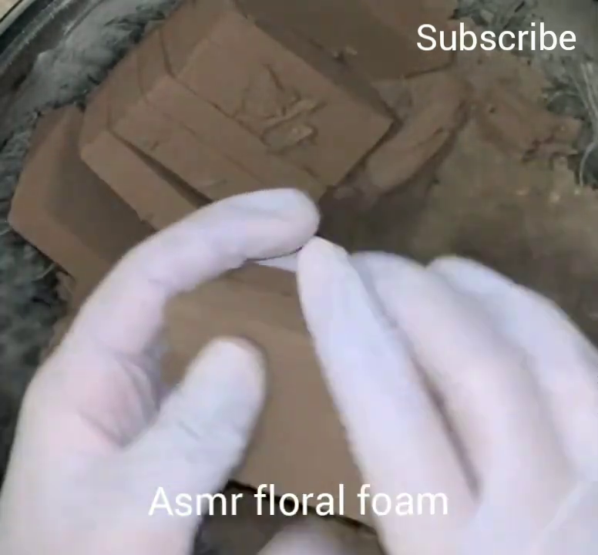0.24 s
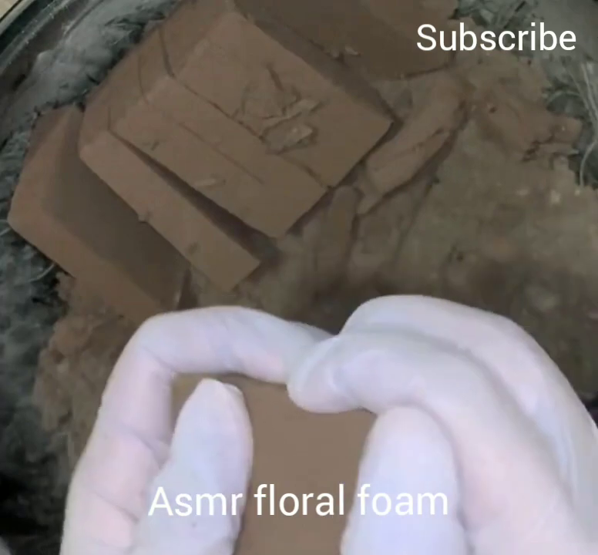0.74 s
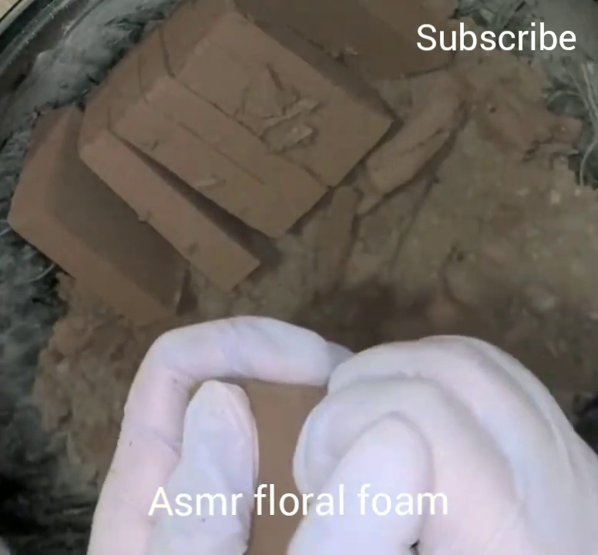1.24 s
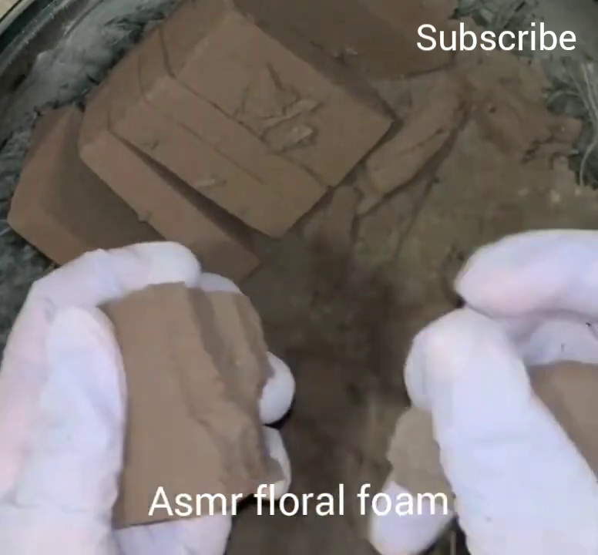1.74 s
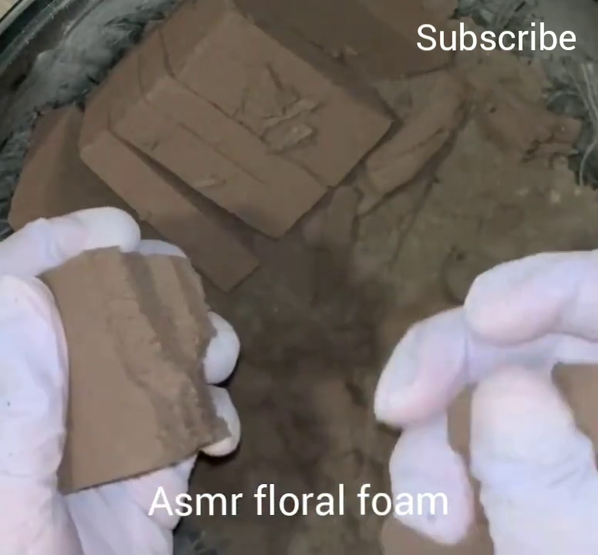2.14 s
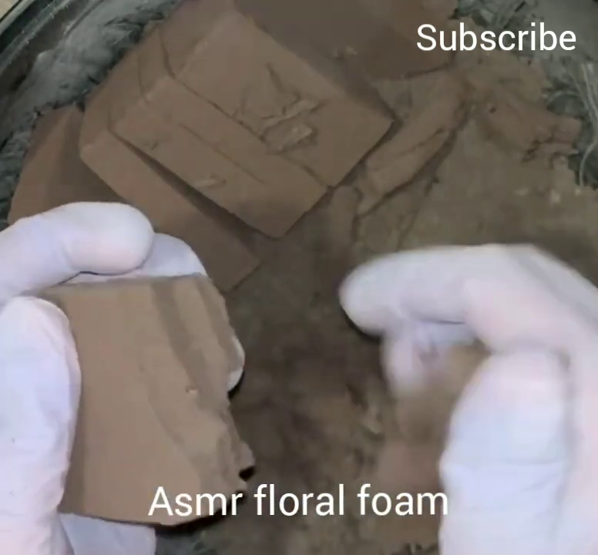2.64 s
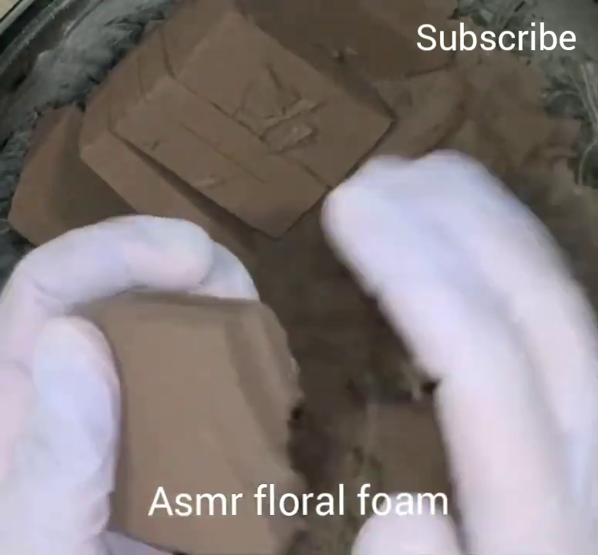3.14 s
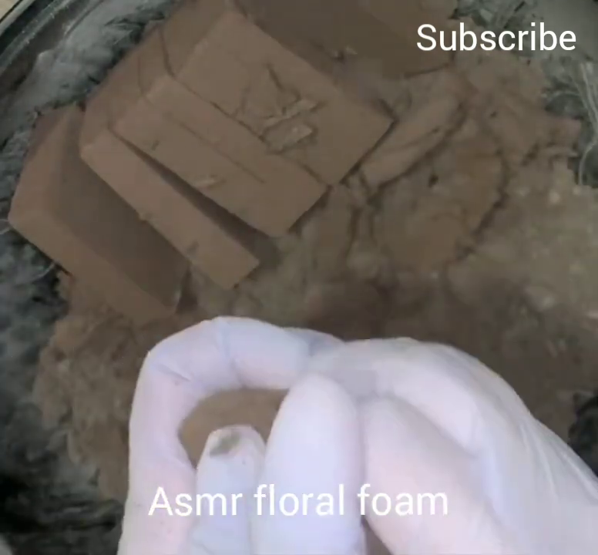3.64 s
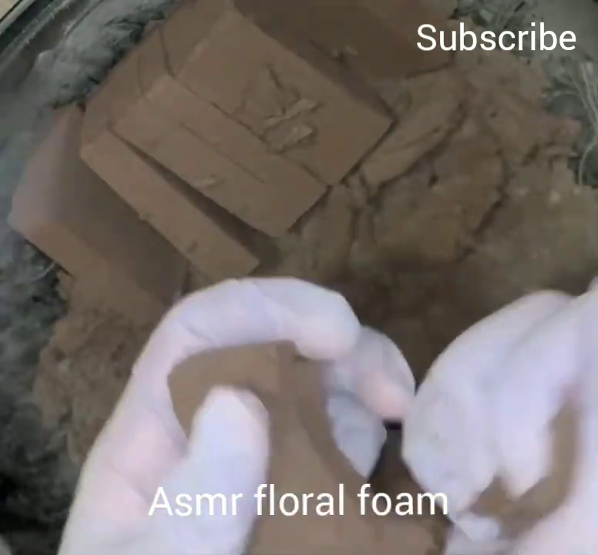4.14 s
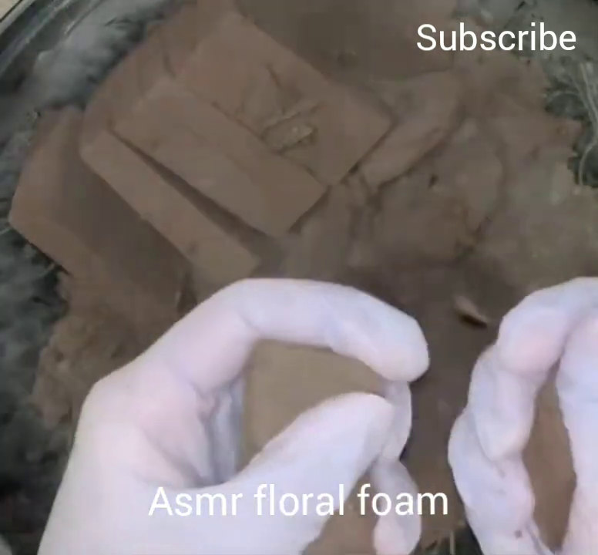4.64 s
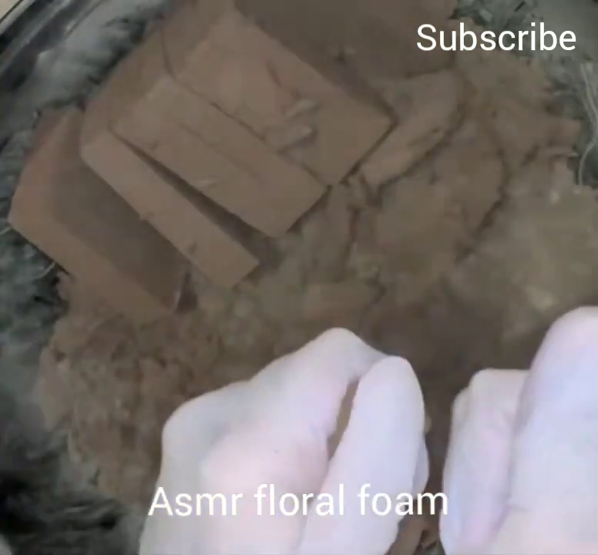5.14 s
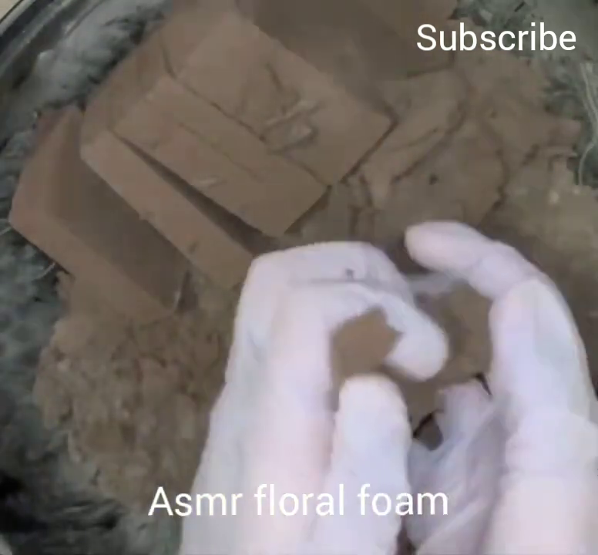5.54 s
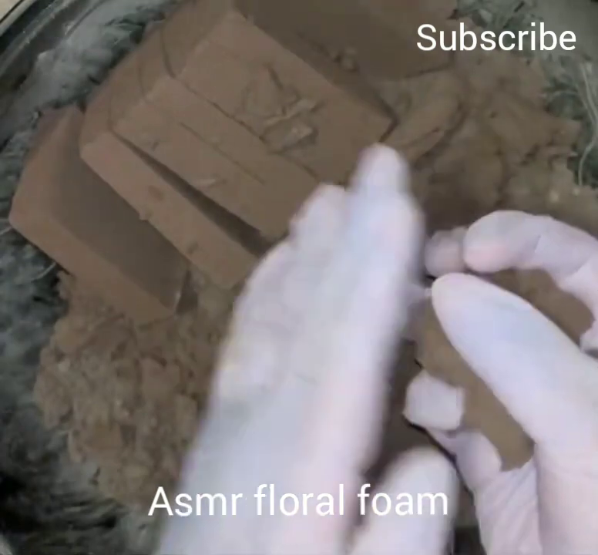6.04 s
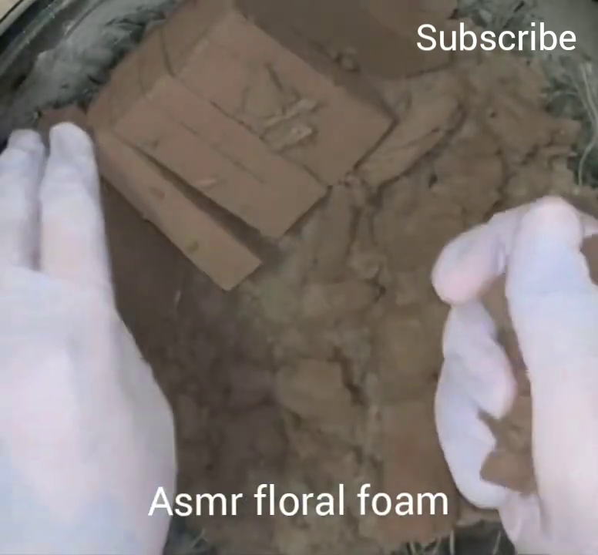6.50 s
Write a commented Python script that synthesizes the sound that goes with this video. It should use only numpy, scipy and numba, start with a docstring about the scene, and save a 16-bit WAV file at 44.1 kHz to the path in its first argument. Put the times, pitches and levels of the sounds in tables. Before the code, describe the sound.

Gloved hands crush dry, brittle foam close by, making crisp crunching and crackling in repeated squeezes with small snaps.

```python
"""Over a tub of crumbs, close to a two-port phone, gloved hands crush blocks of dry brittle foam.
Thousands of cell walls crack each second, bigger pieces snap with a dull knock, and the hands bump
softly through the tub. A motor hums far off. The loudest squeezes overload the recorder, and the
sound drops out once for a quarter second."""
import sys
import numpy as np
from scipy import signal
from scipy.fft import rfft, irfft, next_fast_len
from scipy.io import wavfile
from scipy.ndimage import uniform_filter1d
from numba import njit

SR = 44100
rng = np.random.default_rng(int(sys.argv[2]) if len(sys.argv) > 2 else 0)


def wrap_up_sound(samples):
    """Save the sound to the file named by the first command line argument, as 16-bit audio."""
    columns = np.atleast_2d(samples).T
    # keep every value between -1 and 1, then stretch to whole-number steps
    tamed = np.clip(columns, -1, 1)
    steps = np.round(tamed * 32767).astype(np.int16)
    wavfile.write(sys.argv[1], SR, steps)


N = 298557
T = np.arange(N) / SR
FFT_SIZE = next_fast_len(N)
HZ = np.fft.rfftfreq(FFT_SIZE, 1 / SR) + 1e-3


# tone of a cracking cell wall, shaped by the hands and the tub: f/Hz, level/dB
CELL_TONE = [(900, -24.5), (1300, -13), (1550, -5.5), (1900, -4.5), (2300, -3), (2750, -2), (3200, -0.5),
             (4000, 2.5), (4500, 1), (4950, 2.5), (5500, -0.5), (6900, -1), (7700, -1.5), (8800, 2),
             (9500, 0), (10300, 0), (12500, -2), (14000, -1.5), (15500, -4)]
# tone of the block's body: f/Hz, level/dB
BODY_TONE = [(71, -37), (120, -13), (162, -7), (291, -2), (409, -8.5), (667, -4.5), (983, -4), (1300, 8.5),
             (1690, -43), (2860, -120)]

def foam():
    """Cells of all sizes give way together under the hands; each size also flickers alone."""
    fine_db, coarse_db = squeeze()
    medium_db, dust_db, body_db, _ = size_mix()
    coarser_db = coarse_db + 9  # coarser breaking than usual lifts the mids and the body
    jump_db = slips()
    fine = grit(6000, 9774, per_s=14000, spread_db=1.5, cycles=34, ring_db=-12.5)
    fine *= undb(fine_db + jump_db + walk(45))
    medium = grit(3008, 6013, per_s=12000, spread_db=2.75, cycles=55, ring_db=-7)
    medium *= undb(fine_db + medium_db + 0.33 * coarser_db + 1.05 * jump_db + 0.16 * walk(33))
    coarse = grit(1100, 3003, per_s=8000, spread_db=2.8, cycles=52, ring_db=-7)
    coarse *= undb(fine_db + coarse_db + jump_db + 1.65 * walk(45))
    dust = band(cracks(18000, 1.3), 9660, 27000, CELL_TONE)
    dust *= undb(fine_db + dust_db + 0.79 * jump_db + 1.3 * walk(30))
    body = band(cracks(4000, 1.85), 120, 906, BODY_TONE)
    body *= undb(fine_db + body_db + 0.67 * coarser_db + jump_db + 0.89 * walk(20))
    lone_ticks = band(cracks(250, 1.8), 1500, 20000, CELL_TONE) * undb(fine_db + jump_db - 9)
    return lone_ticks + fine + medium + coarse + dust + body


# one envelope per grip of the hands: t/s, fine crackle/dB, coarse crackle/dB re fine
GRIPS = [
    [(0, -21, -12), (.054, -23.5, -12), (.125, -40, -13), (.188, -29, -24.5), (.22, -33.5, -7.5),
     (.332, -27.5, -10.5), (.445, -38, -12)],
    [(.52, -25, -10), (.57, -26, -8), (.63, -25, -6), (.69, -19.5, -1), (.76, -18.5, -4), (.8, -15.5, -3),
     (.87, -14, -2), (.94, -14.5, -2.5), (1.02, -15.5, -5), (1.08, -15, -9), (1.125, -12, -6.5),
     (1.17, -13, -4.5), (1.2, -19, -10), (1.235, -20, -8), (1.298, -28.5, -8), (1.34, -31.5, 0),
     (1.377, -38.5, -10)],
    [(1.44, -30.5, -7.5), (1.58, -29.5, -3), (1.71, -22.5, -7.5), (1.82, -26, -11), (1.95, -19, -9.5),
     (2, -20.5, -9), (2.106, -17, -13), (2.25, -26.5, -5), (2.31, -26.5, -9.5), (2.52, -38, -10.5),
     (2.59, -37.5, -30), (2.654, -36.5, -15.5)],
    [(2.963, -36.5, -7), (3.013, -27, -12.5), (3.083, -36.5, -21.5), (3.143, -24, -10.5),
     (3.178, -28.5, -14.5), (3.22, -21.5, -11.5), (3.273, -23, -5)],
    [(3.31, -14, -4.5), (3.463, -9, -3.5), (3.516, -19, -9), (3.59, -16.5, -4), (3.657, -15.5, -6),
     (3.705, -27.5, -0.5), (3.756, -32, -4.5), (3.85, -24.5, -14), (3.934, -20.5, -7.5), (3.98, -38.5, -8)],
    [(4.08, -27, -14.5), (4.116, -32, -11), (4.21, -22.5, -12), (4.265, -26, -6.5), (4.35, -18, -8),
     (4.42, -18, -9), (4.53, -9.5, -11.5), (4.64, -16, -11), (4.72, -12.5, -13), (4.83, -21, -13.5),
     (4.92, -15.5, -8), (5.1, -29, -1.5), (5.155, -37.5, -8)],
    [(5.268, -34.5, -6.5), (5.318, -31, -6.5), (5.418, -32.5, -9), (5.53, -30, -9.5), (5.572, -33.5, -15),
     (5.72, -28, -13.5), (5.887, -36.5, -7)],
    [(5.946, -27, -6), (6, -27.5, -7), (6.07, -20, -7), (6.224, -19, -8.5), (6.33, -25.5, -9),
     (6.46, -21.5, -11.5), (6.5, -25.5, -12), (6.556, -37, -10), (6.61, -25, -6.5), (6.67, -33.5, -5),
     (6.77, -25.5, -10.5)],
]

def squeeze():
    """The crackle swells and eases with each grip: fine and coarse envelopes in dB."""
    return curves(T, np.concatenate(GRIPS))


# mix of what crumbles: t/s, medium/dB re fine, dust/dB re fine, body/dB re fine, rumble/dB
SIZE_MIX = [(0, -3.5, 2, -13.5, -45), (.6, -5, 4.5, -16, -46), (1.1, -5.5, 4.5, -19.5, -44),
            (1.5, -0.5, 2.5, -14.5, -43.5), (2, -4.5, 4, -22, -49.5), (2.6, -2.5, 5, -4.5, -42),
            (3, -5, -4.5, -10, -44), (3.4, -2, 7.5, -22, -56), (3.85, -4, -2, -17.5, -48),
            (4.3, -4, 3, -20, -51), (4.75, -4, 4, -19, -50.5), (5.1, -5, 3.5, -9.5, -43),
            (5.6, -4, 1.5, -10, -42), (6.1, -5, 1, -19, -52), (6.4, -3.5, 3.5, -13.5, -42),
            (6.77, -8.5, 2.5, -12.5, -45.5)]

def size_mix():
    """The blend of fragment sizes shifts slowly: medium, dust, body and rumble envelopes in dB."""
    return curves(T, SIZE_MIX)


# accents where the foam gives under the fingers: t/s, jump/dB, settling time/s
SLIP_CUES = [(0.056, 9.5, 0.0026), (0.249, 8, 0.028), (0.326, 5, 0.012), (0.476, 12, 0.0054),
             (0.615, 11, 0.0067), (0.721, 13, 0.0035), (0.751, 7, 0.005), (0.805, 9, 0.003),
             (0.904, 9, 0.019), (0.989, 8, 0.026), (1.039, 16, 0.013), (1.147, 20, 0.024),
             (1.255, 15, 0.0036), (1.327, -1, 0.0055), (1.419, 5, 0.0028), (1.501, 15.5, 0.0063),
             (1.596, 1, 0.014), (1.651, 6.5, 0.0026), (1.67, 9, 0.0038), (1.695, 9, 0.0053),
             (1.758, -13, 0.0019), (1.814, 13, 0.0042), (1.945, 5.5, 0.017), (2.011, 8, 0.0071),
             (2.278, 16, 0.0046), (2.306, 4, 0.0072), (2.402, 4, 0.00607), (2.558, 2, 0.011),
             (2.62, 11, 0.022), (2.993, 6.5, 0.0097), (3.122, 4, 0.014), (3.205, 11, 0.0059),
             (3.562, 17, 0.011), (3.616, 15.5, 0.015), (3.902, 5, 0.018), (4.034, 15, 0.0037),
             (4.078, 9, 0.003), (4.304, 7, 0.0065), (4.347, 5, 0.0033), (4.414, 6, 0.006),
             (4.686, 28, 0.0074), (4.89, 33.5, 0.0058), (4.915, 12, 0.004), (4.942, 9.5, 0.003),
             (5.003, 14, 0.0036), (5.075, 11.5, 0.003), (5.127, 9, 0.008), (5.312, 9.5, 0.01),
             (5.347, 9, 0.007), (5.436, 10, 0.009), (5.457, 2, 0.003), (5.471, 8.5, 0.003),
             (5.51, 8, 0.003), (5.527, 6.5, 0.005), (5.717, 13, 0.003), (5.754, 11, 0.0094),
             (6.029, 17, 0.0066), (6.06, 10, 0.003), (6.08, 2, 0.0053), (6.138, 3.5, 0.0027),
             (6.225, 7, 0.0073), (6.601, 0, 0.0058), (6.745, 12, 0.0087), (0.123, 8.5, 0.014),
             (0.862, 4.5, .006), (0.96, 12, 0.005), (1.098, 11.5, 0.014), (1.865, 6, 0.01),
             (3.346, 6, .004), (3.371, 7, .006), (3.431, 8, 0.011), (3.454, 12, .012), (3.58, 6, .004),
             (3.606, 8, .003), (4.628, 7, .005), (1.163, 6, .008), (3.6, 11.5, 0.014), (4.513, 12, 0.0056),
             (4.534, 16, 0.0094)]

def slips():
    """Each sudden give jolts the crackle level, in dB, then settles; many small ones come by chance."""
    large = np.zeros(N)
    for s, db, settle_s in SLIP_CUES:
        age = np.maximum(T - s, 0)
        large += db * np.exp(-age / settle_s) * (1 - np.exp(-age / 0.0028))
    kicks = (rng.random(N) < 90 / SR) * rng.exponential(size=N)
    small = signal.lfilter([1], [1, -np.exp(-1 / (0.0061 * SR))], kicks)
    return large + 0.87 * small


def grit(lo_hz, hi_hz, per_s, spread_db, cycles, ring_db):
    """Dry clicks and ringing crumbs from one range of cell sizes."""
    clicks = unit_rms(cracks(per_s, spread_db))
    ringing = undb(ring_db) * crumbs(lo_hz, hi_hz, cycles)
    return band(clicks + ringing, lo_hz, hi_hz, CELL_TONE)


def cracks(per_s, spread_db):
    """Cell walls break in two unrelated showers of clicks: many small, few large."""
    size = undb(spread_db * rng.exponential(size=(2, N))) * rng.standard_normal((2, N))
    return size * (rng.random((2, N)) < per_s / SR)


def crumbs(lo_hz, hi_hz, cycles, per_s=1200, spread_db=1.2):
    """Stiff fragments ring for some cycles as they break free."""
    count = per_s * N // SR
    onset, pitch, size_rank = rng.random((count, 3)).T
    hz = lo_hz * (hi_hz / lo_hz) ** pitch
    size = undb(-spread_db * np.log(1 - size_rank))[:, None] * rng.standard_normal((count, 2))
    return unit_rms(ring((onset * N).astype(np.int64), hz, cycles / hz, size))


@njit
def ring(start, hz, decay_s, size):
    """Each crumb is a damped sine at its own pitch, with its own size in each of two rows."""
    out = np.zeros((2, N))
    for k in range(len(start)):
        pole = np.exp(2j * np.pi * hz[k] / SR - 1 / (decay_s[k] * SR))
        phasor = 1 + 0j
        for i in range(start[k], min(start[k] + int(5 * decay_s[k] * SR), N)):
            out[0, i] += size[k, 0] * phasor.imag
            out[1, i] += size[k, 1] * phasor.imag
            phasor *= pole
    return out


# pieces snapping: t/s, knock level/dB, f/Hz, crack level/dB
SNAP_CUES = [(0.019, -19.5, 666, -20), (0.472, -28, 350, -18), (0.65, -22, 737, -16),
             (0.842, -22.5, 592, -4), (0.903, -10, 1573, -7), (0.968, -10.5, 300, -15),
             (0.993, -19, 810, -5), (1.043, -13, 870, -15), (1.105, -10, 305, -9), (1.148, -8.5, 1500, -10),
             (1.334, -14.5, 727, -15), (1.526, -25, 350, -26), (1.695, -19.5, 735, -18),
             (2.201, -17, 313, -22.5), (3.276, -23, 865, -8), (3.561, -23, 347, -2),
             (3.919, -33, 1130, -24), (3.349, -12, 255, -12), (3.626, -10.5, 305, -6),
             (4.443, -27, 306, -7), (4.516, -16, 516, -11), (4.534, -8, 640, -8), (4.689, -10, 855, -1),
             (4.891, -18, 700, -8), (4.944, -19.5, 470, -8), (5.078, -15, 308, -15),
             (5.456, -22.5, 1300, -24), (5.686, -24.5, 345, -16), (5.736, -38, 370, -28),
             (6.03, -20, 796, -13), (6.364, -43, 460, -21)]
# modes of a breaking piece: multiple of its pitch, level/dB, decay/s
PIECE_MODES = [(1, 0, 0.0017), (.45, -6, 0.004), (1.55, -2, 0.0016), (2.2, -1, 0.0014), (3.1, -7, .0012)]

def snaps(length=2048, low_cut_hz=168):
    """Each break is a short damped knock of the block under a bright burst of cracks."""
    out = np.zeros((2, N + length))
    t = np.arange(length) / SR
    for s, knock_db, hz, crack_db in SNAP_CUES:
        knock = sum(undb(db) * np.sin(2 * np.pi * hz * ratio * t) * np.exp(-t / decay_s)
                    for ratio, db, decay_s in PIECE_MODES)
        knock *= 1 - np.exp(-t / 0.00075)  # the break takes a moment to run through
        bright_noise = signal.lfilter([1, -0.55], [1], rng.standard_normal((2, length)))
        burst = bright_noise * np.exp(-t / 0.009) * (1 - np.exp(-t / .002))
        i = int((s - .001) * SR)
        out[:, i:i + length] += undb(knock_db + 7.5) * knock * [[1], [.3]] + undb(crack_db) * burst
    # small pieces radiate little bass
    return signal.lfilter(*signal.butter(2, low_cut_hz, "high", fs=SR), out[:, :N])


# the sharpest single cracks: t/s, level/dB
TICK_CUES = [(0.478, -13), (0.619, -11), (0.724, -4), (1.257, -11), (1.654, -8), (1.673, -6), (1.761, -11),
             (1.816, -9), (1.948, -3), (2.064, -2), (2.1, -3), (2.283, -4), (3.347, -1), (3.372, -1),
             (3.608, 0), (4.084, -9), (4.353, -8), (5.005, -8), (5.44, -15), (6.034, -3), (6.062, -5),
             (6.084, -5), (6.149, -4), (6.195, -3), (6.229, -3)]

def ticks(decay_s=.0003, right_lag_s=.00016):
    """Single cracks die within a millisecond and reach the right port a moment later."""
    out = np.zeros((2, N + 256))
    for s, db in TICK_CUES:
        tick = np.diff(rng.standard_normal(129)) * np.exp(-np.arange(128) / SR / decay_s)
        for channel, lag_s in zip(out, (0, right_lag_s)):
            i = int((s + lag_s) * SR) - 6
            channel[i:i + 128] += undb(db) * tick / np.abs(tick).max()
    return out[:, :N]


# soft bumps of the hands through the tub: t/s, level/dB, f/Hz
THUMP_CUES = [(.03, -40, 109), (.45, -37, 68.8), (.62, -30, 73), (.74, -39, 129.4), (0.938, -28, 134.3),
              (1.04, -31, 109), (1.14, -31, 60), (1.659, -37, 70.3), (1.959, -35, 86.7), (2.182, -45, 138),
              (3.41, -22, 93.5), (3.55, -33, 75), (3.95, -39, 62.7), (4.501, -33, 114.5), (4.88, -34, 89),
              (4.96, -30, 65), (5.06, -35, 71), (5.65, -35, 72), (5.88, -38, 75), (6.181, -38, 107.4),
              (6.25, -35, 64.6), (6.33, -33, 75), (6.46, -33, 62.4), (6.71, -36, 74.7)]

def thumps(attack_s=0.016):
    """A bump sets off the tub's low wobble, which swells and dies softly."""
    out = np.zeros(N)
    for s, db, hz in THUMP_CUES:
        age = np.maximum(T - s, 0) / attack_s
        out += undb(db) * age * np.exp(1 - age) * np.sin(2 * np.pi * hz * (T - s))
    return out * np.array([[1], [.35]])


# colour of the air and the rumble: f/Hz, level/dB
ROOM_TONE = [(15, -54), (25, -1), (250, 1), (569, -6.5), (866, -21.5), (1120, -25), (1680, -12.5),
             (1970, -16), (2510, -11.5), (3000, -30.5), (3900, -63.5)]

def room():
    """A bed of air noise and low rumble; handling shakes the tub more in a hard squeeze."""
    air = band(rng.standard_normal((2, N)), 150, 3000, ROOM_TONE)
    air *= undb(-40 + 1.36 * walk(3.02) + 2.3 * walk(15))
    harder_db = squeeze()[0] + 27  # fine crackle above its usual level
    rumble = band(rng.standard_normal((2, N)), 40, 150, ROOM_TONE)
    rumble *= undb(size_mix()[3] + 0.41 * harder_db + 2.2 * walk(6.2))
    return air + rumble


# partials of the motor: f/Hz, level/dB
MOTOR_PARTIALS = [(62, -51), (186, -48.5), (247.6, -42), (371.5, -45.5)]

def motor():
    """A distant motor hums; its partials drift in pitch together and waver in level separately."""
    drifting_t = np.cumsum(1 + 0.00287 * walk(3)) / SR
    hum = sum(undb(db + 2 + 0.29 * walk(5.1)) * np.sin(2 * np.pi * hz * drifting_t)
              for hz, db in MOTOR_PARTIALS)
    return hum * np.array([[1], [0]])


# where the hands work: t/s, weights of four places (gripping the block, crumbling a piece, far to the right,
# resting by the tub)
HAND_PLACES = [(0.1, 0.0, 0.0, 0.14, 0.65), (0.3, 0.38, 0.25, 0.0, 0.91), (0.5, 0.45, 0.07, 0.0, 0.66),
               (0.7, 1.18, 0.0, 0.0, 0.19), (0.9, 1.07, 0.0, 0.025, 0.081), (1.1, 0.75, 0.0, 0.0, 0.02),
               (1.3, 0.45, 0.48, 0.046, 0.0), (1.5, 0.03, 1.04, 0.0, 0.0), (1.8, 0.44, 1.05, 0.0, 0.0),
               (2.1, 0.04, 0.99, 0, 0.0), (2.3, 0.0, 1.1, 0.0, 0.0), (2.55, 0.0, 0.16, 0.06, 0.92),
               (3.05, 0, 0.53, 0.0, 0.29), (3.25, 0.74, 0.23, 0.12, 0.061), (3.5, 0.99, 0.0, 0.0, 0.02),
               (3.75, 0.65, 0, 0.03, 0.0), (4, 0.39, 0.72, 0.14, 0.12), (4.25, 0.04, 0.85, 0.31, 0.21),
               (4.5, 0, 0.57, 0.14, 0.34), (4.75, 0.44, 0.66, 0.21, 0.1), (5, 0.085, 1, 0.0, 0.0),
               (5.25, 0.0018, 0.34, 0.18, 0.5), (5.5, 0.0, 0.046, 0.34, 0.76), (5.75, 0, 0.11, 0.5, 0.095),
               (6, 0.0, 0.17, 1.03, 0.04), (6.3, 0.0, 0.026, 1.07, 0.0), (6.55, 0.37, 0.26, 0.69, 0.18),
               (6.75, 0.26, 0.0, 0.81, 0.0)]
# stereo likeness: f/Hz, share common to both ports for each place
PORT_LIKENESS = [(60, 0.47, 0.83, 0.65, 0.81), (150, 1, 0.99, 0.99, 0.99), (300, 0.95, 0.89, 0.91, 0.84),
                 (600, 0.66, 0.64, 0.59, 0.7), (900, 0.84, 0.57, 0.71, 0.57),
                 (1200, 0.26, 0.41, 0.27, 0.29), (1500, 0.34, 0.53, 0.48, 0.46),
                 (1800, 0.77, 0.86, 0.48, 0.81), (2050, 0.59, 0.91, 0.44, 0.73),
                 (2380, 0.08, 0.83, 0.36, 0.35), (2550, 0.13, 0.25, 0.4, 0.34),
                 (2800, 0.35, 0.53, 0.97, 0.75), (3000, 0.08, 0.33, 0.54, 0.57),
                 (3230, 0.24, 0.41, 0.28, 0.2), (3660, 0.14, 0.28, 1, 0.54), (3900, 0.39, 0.49, 0.31, 0.18),
                 (4230, 0.18, 0.86, 0.12, 0.29), (4520, 0.19, 0.35, 0.52, 0.28),
                 (4900, 0.48, 0.71, 0.38, 0.47), (5300, 0.08, 0.31, 0.37, 0.21),
                 (5660, 0.05, 0.35, 0.31, 0.15), (6260, 0.2, 0.22, 0.39, 0.15),
                 (6680, 0.25, 0.35, 0.78, 0.5), (7000, 0.3, 0.51, 0.81, 0.72),
                 (7400, 0.21, 0.35, 0.36, 0.28), (7800, 0.32, 0.27, 0.17, 0.11),
                 (8340, 0.47, 0.47, 0.61, 0.51), (8800, 0.44, 0.39, 0.4, 0.34),
                 (9400, 0.34, 0.45, 0.35, 0.35), (10000, 0.34, 0.45, 0.27, 0.24),
                 (10800, 0.33, 0.37, 0.44, 0.27), (11700, 0.04, 0.27, 0.36, 0.13),
                 (12500, 0.2, 0.24, 0.38, 0.19), (13500, 0.25, 0.21, 0.39, 0.4),
                 (14500, 0.32, 0.34, 0.27, 0.34), (15400, 0.14, 0.22, 0.25, 0.21)]
# lead of the left port on top of the port lag: f/Hz, phase/rad for each place
PORT_LEAD = [(60, -0.11, -0.09, -0.12, -0.09), (150, -0.16, -0.18, -0.18, -0.17),
             (300, -0.17, -0.27, -0.22, -0.23), (600, -0.65, -0.6, -0.53, -0.54),
             (900, -0.69, -0.5, -0.49, -0.53), (1200, -0.08, 0.18, -0.16, -0.07),
             (1500, -0.07, 0.23, -0.09, 0.02), (1800, 0.73, 0.8, 0.21, 0.72),
             (2050, 0.83, 0.69, 0.04, 0.72), (2300, 1.39, 0.24, -0.8, 0.06),
             (2550, -1.17, -0.03, -0.58, -0.32), (2800, -0.2, 0.42, -0.2, -0.1),
             (3050, -0.96, 0.76, -0.35, -0.31), (3300, -3.62, 1.97, -1.45, -1.35),
             (3600, -5.47, 0.41, -0.91, -0.64), (3900, -4.86, 1.1, -0.31, 0.41),
             (4200, -4.84, 1.26, -0.58, 1.21), (4500, -7.12, 0.07, -1.43, -0.57),
             (4900, -5.99, 0.53, -0.31, 0.12), (5300, -3.54, 0.53, -2.05, -2.55),
             (5700, -3.44, -0.18, -2.36, -1.93), (6200, -6.51, -0.56, -1.8, -1.57),
             (6600, -7.3, -1.16, -1.37, -1.33), (7000, -7.49, -1.29, -1.61, -1.57),
             (7400, -6.37, -0.0, -1.62, -1.16), (7800, -5.18, 0.98, 0.19, 0.44),
             (8300, -5.56, 0.85, 0.16, 0.08), (8800, -5.34, 0.88, 0.14, 0.56),
             (9400, -6.81, -1.0, -1.57, -1.17), (10000, -5.7, 0.26, -1.25, 0.07),
             (10800, -7.47, -0.56, -1.94, -1.14), (11600, -4.74, -0.69, -3.32, -3.44),
             (12500, -7.76, -1.59, -2.4, -2.12), (13500, -8.06, -1.78, -2.52, -2.42),
             (14500, -6.1, 0.05, -0.56, -0.55), (15400, -7.33, -1.43, -2.36, -1.58)]

def ports(pair, lag_s=8 / SR, likeness_boost=1.28, waver_rad=0.32, right_db=0.5):
    """Row 0 reaches both ports, shifted in phase on the left; row 1 is scattered sound that differs."""
    hz, s, (common, scattered) = signal.stft(pair, SR, nperseg=512, noverlap=384)
    weight = np.maximum(curves(s, HAND_PLACES), 0) + 1e-3
    by_place = np.clip(curves(hz, PORT_LIKENESS), 0, 1) * np.exp(1j * curves(hz, PORT_LEAD))
    likeness = by_place.T @ (weight / weight.sum(axis=0))
    patch, waver = (patches(common.shape, hz[1], s[1] - s[0]) for _ in range(2))
    # the whole sound is made a little more alike in both ports
    depth = likeness_boost * np.arctanh(np.minimum(abs(likeness), .99))
    share = np.tanh(depth * np.exp(.8 * patch))  # likeness comes and goes in patches
    lead = np.angle(likeness) + 2 * np.pi * lag_s * hz[:, None]
    # the lead wavers as the hands shift; long waves hardly feel it
    lead += waver_rad * waver * np.minimum(hz / 1500, 1)[:, None]
    mid = np.sqrt((1 + share) / 2) * common
    side = np.sqrt((1 - share) / 2) * scattered
    stereo = np.array([(mid + side) * np.exp(1j * lead), (mid - side) * undb(right_db)])
    return signal.istft(stereo, SR, nperseg=512, noverlap=384)[1][:, :N]


def patches(shape, hz_step, s_step, width_hz=260, length_s=.07):
    """A smooth random field over pitch and time; spread 1."""
    field = rng.standard_normal(shape)
    for axis, size in enumerate((width_hz / hz_step, length_s / s_step)):
        field = uniform_filter1d(field, max(int(size), 1), axis=axis)
        field = uniform_filter1d(field, 2, axis=axis)
    return field / field.std()


def band(x, lo_hz, hi_hz, tone):
    """Colour x by a tone curve inside a soft-edged band; rms 1."""
    hz, db = np.transpose(tone)
    gain = undb(np.interp(np.log(HZ), np.log(hz), db))
    gain /= np.sqrt((1 + (lo_hz / HZ) ** 8) * (1 + (HZ / hi_hz) ** 16))
    return unit_rms(irfft(rfft(x, FFT_SIZE) * gain, FFT_SIZE)[..., :N])


def walk(rate):
    """Random levels held 1 / rate s and slewed twice; spread near 1."""
    hold = int(SR / rate)
    steps = np.repeat(rng.standard_normal(N // hold + 1), hold)
    return 1.672 * uniform_filter1d(uniform_filter1d(steps, hold), hold)[:N]


def curves(x, table):
    """A table's value columns, interpolated at x along its first column."""
    knots, *columns = np.transpose(table)
    return np.array([np.interp(x, knots, column) for column in columns])


def unit_rms(x):
    return x / np.sqrt(np.mean(x ** 2))


def undb(db):
    return 10 ** (np.asarray(db) / 20)


def scene():
    """Foam up front, tub, room and motor behind, all heard through the two ports."""
    return ports(foam() + snaps() + thumps() + room() + motor()) + ticks()


def record(dry, drop_s=2.662, return_s=2.949, treble_back_s=3.125, dull_hz=9700, top_hz=15740):
    """Overload flattens the peaks; the sound fades out, cuts back in and stays dull for a moment."""
    clipped = np.clip(dry * undb(0.68), -.9, .9)
    dull = signal.sosfilt(signal.ellip(10, .2, 80, dull_hz, fs=SR, output="sos"), clipped)
    treble = np.where(T < return_s, 1, np.clip((T - treble_back_s) / .04 + .5, 0, 1) ** 2)
    fade = np.cos(np.pi / 2 * np.clip((T - drop_s) / 0.012, 0, 1)) ** 2
    heard = (treble * clipped + (1 - treble) * dull) * np.where(T < return_s, fade, 1)
    return signal.sosfilt(signal.ellip(12, .3, 70, top_hz, fs=SR, output="sos"), heard)


dry = scene()
out = record(dry)
wrap_up_sound(out)
```